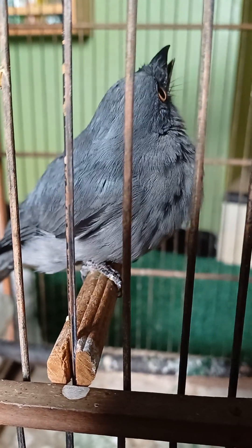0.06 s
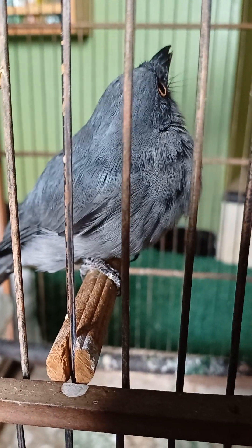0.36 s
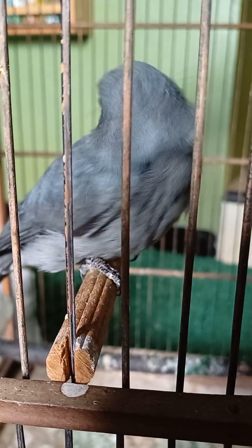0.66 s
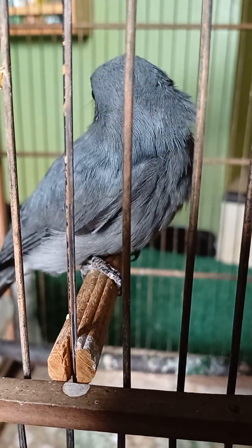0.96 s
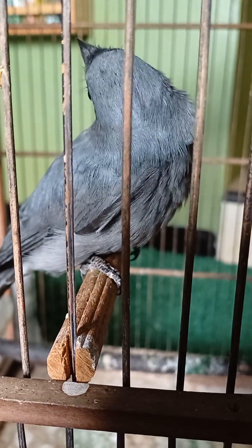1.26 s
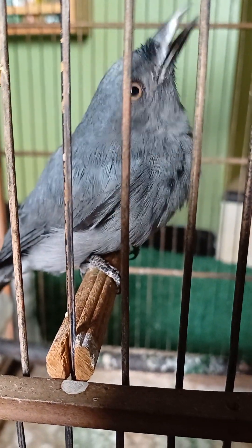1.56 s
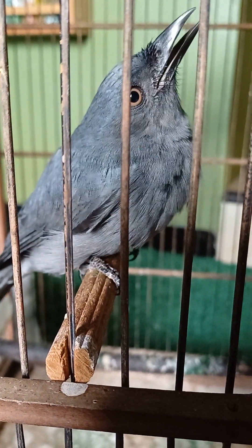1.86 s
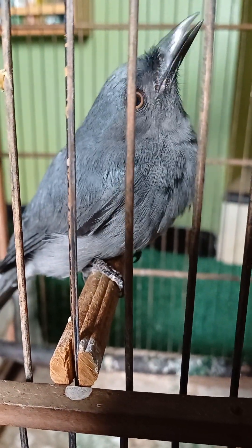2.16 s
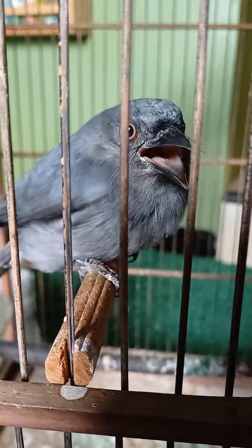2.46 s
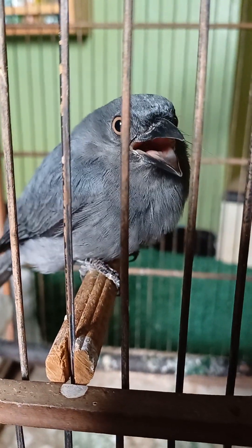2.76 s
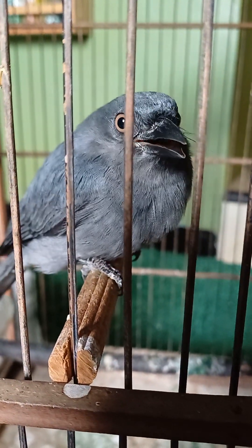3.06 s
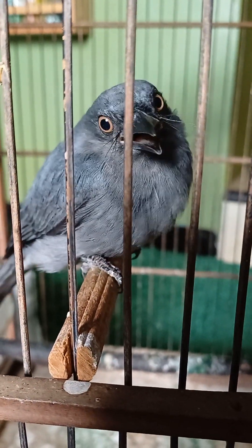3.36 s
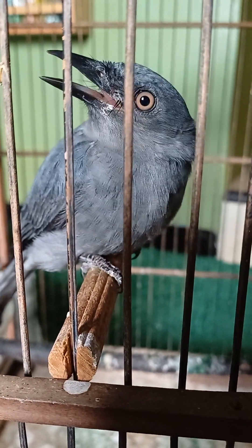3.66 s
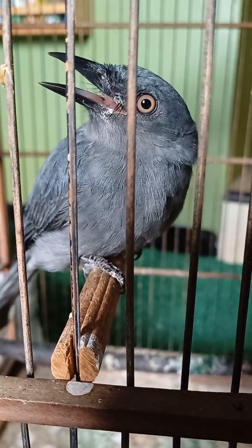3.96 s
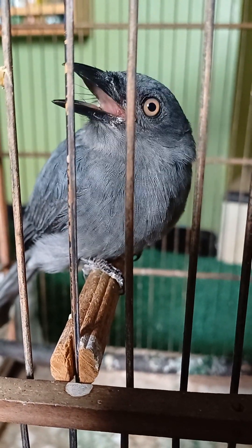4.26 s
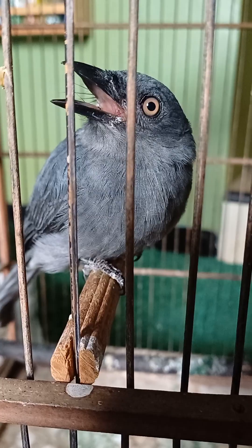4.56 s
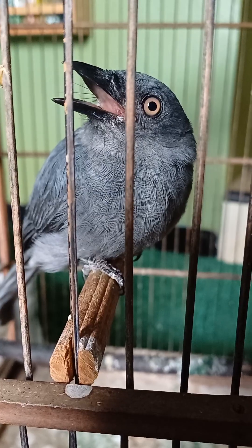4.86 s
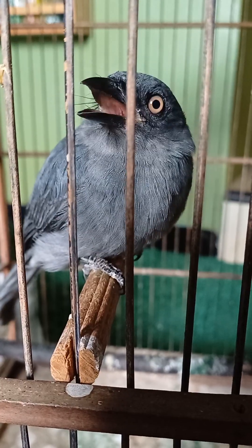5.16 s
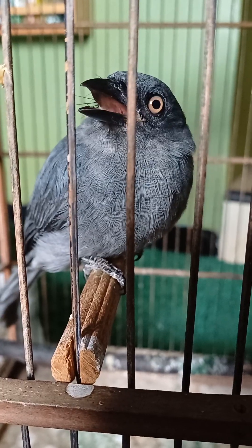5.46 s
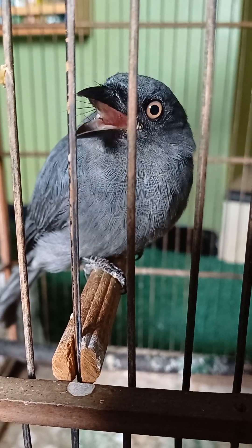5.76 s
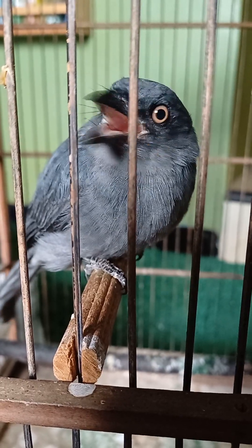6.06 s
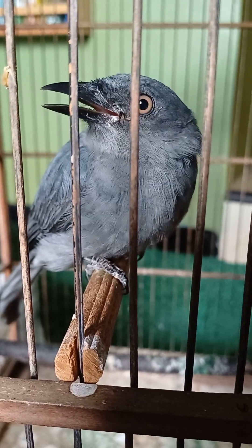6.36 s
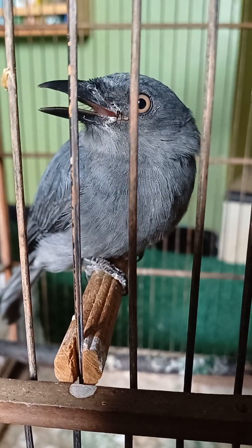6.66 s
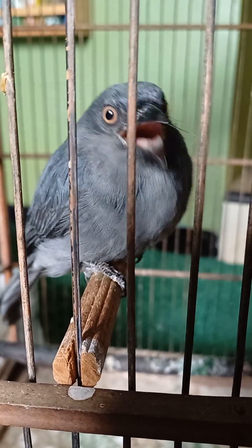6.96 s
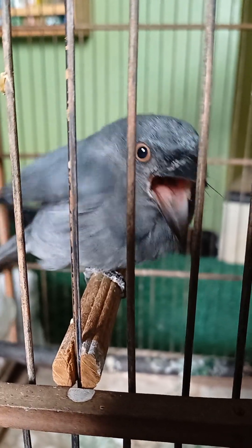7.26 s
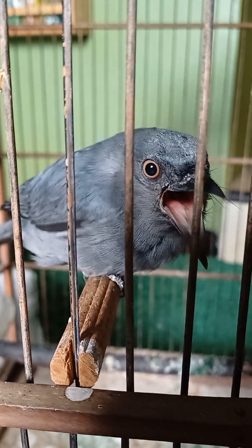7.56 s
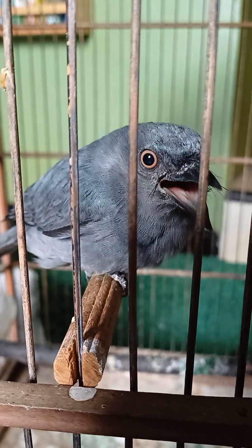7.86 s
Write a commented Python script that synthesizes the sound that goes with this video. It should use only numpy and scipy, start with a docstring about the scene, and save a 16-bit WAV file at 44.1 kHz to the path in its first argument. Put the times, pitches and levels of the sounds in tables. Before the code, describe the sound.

A caged bird, close to the microphone on a porch, gives three thin rising whistles and pauses for about a second. It then sings a long, rapid run of upward chirps, some clear and some scratchy, with three louder outbursts of low, harsh rasping. The cage and walls add a short ring, while traffic rumbles and engines drone faintly far down the street.

```python
"""Caged drongo on a porch

Close to a phone's two microphone ports, a drongo sings runs of upward chirps, about seven a second.
Each is one sweep of the syrinx: ragged and rasping while low, clearing towards a whistle as it climbs.
Cage and porch walls add a short ring; traffic rumbles and engines drone far down the street."""
import sys
import numpy as np
from scipy import signal
from scipy.fft import rfft, irfft, next_fast_len
from scipy.io import wavfile
from scipy.ndimage import uniform_filter1d

SR = 44100
rng = np.random.default_rng(int(sys.argv[2]) if len(sys.argv) > 2 else 0)


def master(y):
    """Save y as 16-bit WAV."""
    cut = np.clip(np.atleast_2d(y).T, -1, 1)
    pcm = np.round(cut * 32767)  # scale
    wavfile.write(sys.argv[1], SR, pcm.astype(np.int16))


N = 352359
TIME = np.arange(N) / SR
MID_SWEEP = .55  # share of a chirp's length at which it passes its middle pitch


def undb(db):
    """Decibels to gain."""
    return 10 ** (np.asarray(db) / 20)


def unit(x):
    """Scale to rms 1."""
    return x / np.sqrt(np.mean(x ** 2) + 1e-18)


def response(points, hz):
    """Read (frequency [Hz], value) points on a log-frequency axis."""
    at, value = np.transpose(points)
    return np.interp(np.log(hz + 1), np.log(at), value)


def shaped(x, gain):
    """Filter by a complex gain given as a function of Hz."""
    size = next_fast_len(len(x) + 512)
    return irfft(rfft(x, size) * gain(np.fft.rfftfreq(size, 1 / SR)), size)[:len(x)]


def colour(x, points):
    """Filter by (frequency [Hz], gain [dB]) points."""
    return shaped(x, lambda hz: undb(response(points, hz)))


def steady(x, size=301):
    """Even out the level, leaving the grain of single cycles."""
    return x / np.sqrt(uniform_filter1d(uniform_filter1d(x ** 2, size), size) + 1e-12)


def wander(rate_hz):
    """Slow random drift with a spread near 1."""
    return np.interp(TIME * rate_hz, np.arange(1024), rng.standard_normal(1024))


def street(mid_db=-40, side_db=-43.0, flutter_db=1, follow=0.35):
    """Far traffic: a wavering rumble and hiss, a little stronger at the right port."""
    # street noise common to both ports, and differing between them: (frequency [Hz], relative level [dB])
    mid_spectrum = [(15, -53), (25, -30), (53, -6.5), (141, -1), (170, -4), (301, -7.5), (545, -10.5),
                    (1740, -15.5), (2610, -16), (2990, -24.5), (3340, -21), (3620, -22), (7710, -35),
                    (11300, -36.5), (16000, -34)]
    side_spectrum = [(15, -52), (25, -39), (59, -12), (695, -10.5), (796, -7.5), (1040, -9), (2410, -8.5),
                     (2910, -16.5), (3620, -15), (7710, -30.5), (16000, -31)]
    # rise and fall of the traffic, followed only in part: (time [s], level [dB])
    traffic = [(0.0, -37.5), (1.44, -27), (2.71, -32), (7.99, -37)]
    mid = unit(colour(rng.standard_normal(N), mid_spectrum))
    side = unit(colour(rng.standard_normal(N), side_spectrum))
    traffic_db = np.interp(TIME, *np.transpose(traffic))
    swell = undb(follow * (traffic_db - traffic_db[SR]) + flutter_db * wander(9))
    out = []
    for sign in (1, -1):  # left, right
        noise = undb(mid_db) * mid + sign * undb(side_db) * side
        shading = [(120, -1.2 * sign), (900, -.2 * sign), (3500, -2.8 * sign), (10000, -1.5 * sign)]
        noise = colour(noise, shading)
        rumble = colour(noise, [(700, 1), (3000, 1.3)])
        out.append(noise + (swell - 1) * rumble)
    return np.array(out)


def engines(fade_s=0.058):
    """Far engines drone in and out, never quite steady in pitch or level."""
    # engine tones: (start [s], end [s], mean pitch [Hz], mean level [dB])
    drones = [(0, 8, 66, -55), (.7, 2.2, 142, -48), (1.9, 2.8, 262, -52), (1.7, 4.9, 524, -57),
              (2.2, 4.6, 786, -62)]
    out = np.zeros(N)
    for start, end, hz, db in drones:
        fade = np.clip(np.minimum(TIME - start, end - TIME) / fade_s, 0, 1)
        turns = np.cumsum(hz * (1 + .006 * wander(12))) / SR
        out += fade * undb(db + 2 * wander(12)) * np.sqrt(2) * np.sin(2 * np.pi * turns)
    return out


def porch(song, t60=0.33, left_db=-20.5, right_db=-15.5, delay_s=0.00095):
    """The porch walls return a dying cloud of reflections, different at each port."""
    # colour of the wall reflections: (frequency [Hz], gain [dB])
    walls = [(600, -9), (2500, 6.5), (5500, 5.5), (8000, 1), (11000, 1.5), (16000, -4)]
    t = TIME[:SR]
    out = []
    for db in (left_db, right_db):
        tail = rng.standard_normal(SR) * np.exp(-np.log(1000) * t / t60) * (t > delay_s)
        tail = colour(tail / np.linalg.norm(tail), walls)
        out.append(undb(db) * signal.fftconvolve(song, tail)[:N])
    return np.array(out)


def cage(note, left_db=-10, right_db=-12, t60=0.055):
    """Near reflections off bars and tray, new for each chirp as the head turns."""
    # colour thrown back by the thin bars: (frequency [Hz], gain [dB])
    bars = [(1200, 2), (2400, 3), (3050, 3), (3800, 0), (5500, 2.5), (12000, 4)]
    t = TIME[:SR // 40]
    tails = rng.standard_normal((2, len(t))) * np.exp(-np.log(1000) * t / t60)
    reflected = colour(note, bars)
    return np.array([undb(db) * signal.fftconvolve(reflected, tail / np.linalg.norm(tail))
                     for db, tail in zip((left_db, right_db), tails)])


def microphone_ports(note, lean, less_delay=0.11, less_shade=0.8):
    """The bird sits off axis: the ports hear it with different delay and shade, less so as it leans in."""
    # shading between the ports, before scaling by lean and side: (frequency [Hz], left minus right [dB])
    balance = [(1000, 0.5), (2400, 1), (4300, -2.5), (5400, -4), (6200, -13.5), (7400, 12.5), (8700, 23),
               (10000, 4.5), (12500, 3), (14200, 7.5), (15500, 24)]
    # delay between the ports, likewise before scaling: (frequency [Hz], lead of the left [rad])
    phase_lead = [(0, 0), (600, .1), (1100, 2.1), (2100, 4.7), (2550, 6.3), (2950, 9.4), (3950, 12.6),
                  (5100, 15.7), (5750, 22), (6500, 25.1), (7000, 28), (9000, 29), (10400, 31.4),
                  (16000, 41)]

    def gain(hz, side):
        shade_db = (1.5 - less_shade * lean) * response(balance, hz)
        power = 2 / (1 + undb(-2 * side * shade_db))
        lead = np.interp(hz * (1 - less_delay * lean), *np.transpose(phase_lead))
        return np.sqrt(power) * np.exp(.5j * side * lead)
    return np.array([shaped(note, lambda hz: gain(hz, side)) for side in (0.849, -1.182)])


def sweep(stage, foot_hz, middle_hz, top_hz, rasp, lift=1.7, whistle_bend=2.2, harsh_bend=1.0):
    """Pitch lifts off a low foot; a whistle rounds off at the top, a harsh call climbs to the end."""
    bend = whistle_bend + (harsh_bend - whistle_bend) * rasp
    rising = np.clip(stage / MID_SWEEP, 0, 1) ** lift
    topping = 1 - np.clip((1 - stage) / (1 - MID_SWEEP), 0, 1) ** bend
    return foot_hz + (middle_hz - foot_hz) * rising + (top_hz - middle_hz) * topping


def pressure_db(stage, length, swell_db, crest, crest_db=1.28, sag_db=-3,
                attack_s=.013, attack_db=-10, release_s=0.0062, release_db=-24):
    """Air pressure through one chirp: it opens quickly, swells, sags and is cut off."""
    body_db = crest_db + np.interp(stage, [0, min(crest, .99), 1], [-swell_db, 0, sag_db])
    opening = np.clip(1 - stage * length / attack_s, 0, 1)
    closing = np.clip(1 - (1 - stage) * length / release_s, 0, 1)
    return body_db + attack_db * opening + release_db * closing


def roughness(stage, hz, rasp, catch, clearing=0.3, settle_hz=1991, settle_span_hz=257):
    """The membranes start ragged and settle towards regular motion as their tension rises."""
    ragged = rasp ** np.interp(stage, [0, .6], [.3, 1]) * (1 - clearing * stage ** 2)
    slack = 0.817 * np.clip((settle_hz - hz) / settle_span_hz, 0, 1)
    return np.maximum.reduce([ragged, slack, .9 * catch])


def syrinx(hz, rough, jitter=.06, shimmer_db=4.5, doubling_db=7.0, oversample=4):
    """One pulse a cycle, and the cycle's phase; rough cycles stray in length and size."""
    samples = np.arange(len(hz))
    turns = np.cumsum(hz) / SR
    cycle = np.arange(int(turns[-1]))
    onsets = np.interp(cycle, turns, samples)
    stray, swell = rng.standard_normal((2, 512))[:, :len(cycle)]
    rough, cycle_hz = rough[onsets.astype(int)], hz[onsets.astype(int)]
    onsets = np.sort(onsets + np.cumsum(jitter * rough * stray * SR / cycle_hz))
    # a rough voice pushed higher alternates strong and weak cycles, adding a croak an octave below
    croak_db = doubling_db * rough * np.interp(cycle_hz, [1300, 1600], [0, 1])
    size = undb(rough * (shimmer_db * swell + croak_db * (-1) ** cycle))
    # each pulse is shared between two neighbours on a finer grid
    fine = np.zeros(oversample * len(hz) + 2)
    place = np.clip(oversample * onsets, 0, oversample * len(hz))
    np.add.at(fine, place.astype(int), size * (1 - place % 1))
    np.add.at(fine, place.astype(int) + 1, size * (place % 1))
    pulses = signal.resample_poly(fine, 1, oversample)[:len(hz)]
    return pulses, np.interp(samples, onsets, cycle) % 1


def breath(phase, rough, rough_db=1, floor_db=-22, puff_cycles=0.54):
    """Each pulse tears off a puff of air, louder the rougher the voice."""
    # colour of the torn air: (frequency [Hz], gain [dB])
    air_spectrum = [(300, -35), (1500, -1), (2400, -2.5), (3000, -1), (3600, 4), (4600, 3), (5500, -2.5),
                    (6500, 1), (9500, -14.5), (11000, -8.5), (12800, -5.5), (14300, -2), (16000, -12)]
    puffs = rng.standard_normal(SR // 4)[:len(phase)] * np.exp(-phase / puff_cycles)
    return (undb(rough_db) * rough ** 1.3 + undb(floor_db)) * unit(colour(puffs, air_spectrum))


def throat(pulses, phase, hz, rasp, gape, second_db=-6, skin_db=-10):
    """The throat colours the pulses and lifts the second harmonic as that passes its resonance."""
    # resonances of the throat and open beak: (frequency [Hz], gain [dB])
    tract = [(150, -64), (700, -4), (1200, -3), (1700, -0.5), (2200, 0), (3200, 2.5), (4500, 1), (5400, -2),
             (6500, -1.5), (8500, -2.5), (11000, -11.5), (14000, -7), (16000, -31)]
    resonance_db = response([(2800, -7.5), (4300, -4.5), (5200, 5), (6600, -3.5)], 2 * hz)
    second = np.cos(4 * np.pi * phase) * undb(second_db + 0.067 * gape + resonance_db)
    # in a harsh call the low fundamental also sounds through the skin
    fundamental = np.cos(2 * np.pi * phase) * rasp ** 2 * undb(skin_db)
    return steady(colour(pulses, tract)) + fundamental + second


def beak_gape(start, level_db, rasp, usual_db=-22, usual_rasp=0.35):
    """How open the beak sounds from the microphone: wider when loud, harsh or facing it; 0 is ordinary."""
    # treble won or lost as the head turns, before the beak scales it: (time [s], level [dB])
    facing = [(0, -9.5), (.45, -4.5), (1.5, 0.5), (2.2, -5), (2.8, 4), (3.2, -0.5), (5, 1), (6.4, -2),
              (7.1, 0), (7.6, 5)]
    effort = 1.48 * (level_db - usual_db) + 11 * (rasp - usual_rasp)
    return effort + np.interp(start, *np.transpose(facing))


def beak(voice, gape):
    """A wider beak rings more near 4.6 kHz and lets out more treble."""
    db_per_gape = [(3500, 0), (4600, .64), (6200, .32), (9000, .56), (13500, .61)]
    return colour(voice, [(hz, db * gape) for hz, db in db_per_gape])


def chirp(start, end, middle_hz, top_hz, level_db,
          catch_s=.014, hook_hz=250.5, waver=.021, pure_db=-2, brighten_db=9):
    """One upward sweep of pulses and air; slack membranes rattle, taut ones whistle."""
    # the voice's character by register:
    # (mid-sweep pitch [Hz], foot pitch [Hz], rasp [0-1], swell [dB], crest [share of the length])
    registers = [(1270, 1110, 0.99, 6, .86), (1481, 1230, 0.9, 10.5, 0.68), (1763, 1530, .5, 10, 0.68),
                 (2226, 1660, 0.35, 12, 0.78), (2514, 2000, 0.07, 11.5, 0.74), (2796, 1900, 0.06, 15, 0.78)]
    register_hz, *traits = np.transpose(registers)
    foot_hz, rasp, swell_db, crest = (np.interp(middle_hz, register_hz, trait) for trait in traits)
    gape = beak_gape(start, level_db, rasp)
    length = end - start
    stage = np.linspace(0, 1, int(length * SR))
    tremor = np.interp(stage, np.linspace(0, 1, 16), rng.standard_normal(16))
    # the voice catches as it starts: a brief scratch, the pitch hooking down onto its foot
    catch = np.exp(-(stage * length / catch_s) ** 2)
    hz = sweep(stage, foot_hz, middle_hz, top_hz, rasp) + hook_hz * (1 - rasp) * catch
    hz = uniform_filter1d(hz * (1 + waver * tremor), size=300, mode="nearest")
    rough = roughness(stage, hz, rasp, catch)
    pulses, phase = syrinx(hz, rough)
    voice = throat(pulses, phase, hz, rasp, gape) + breath(phase, rough)
    # a whistle starts with fewer overtones than a rasp, and gains them as it climbs
    overtones = colour(voice, [(6300, -40), (7500, 0)])
    overtone_db = (1 - rasp) * (pure_db + brighten_db * (stage - MID_SWEEP))
    voice += overtones * (undb(overtone_db) - 1)
    envelope = undb(level_db + pressure_db(stage, length, swell_db, crest))
    return steady(beak(voice, gape)) * envelope * signal.windows.tukey(len(hz), .05)


def drongo(direct_db=-1.83):
    """The bird at close range: its bare song, and what reaches each port directly and off the cage."""
    # three thin whistles, a pause, then scratchy runs with three harsh outbursts:
    # (start [s], end [s], mid-sweep pitch [Hz], top pitch [Hz], level [dB])
    chirps = [ (0.0, 0.055, 2740, 3410, -23.5), (0.187, 0.267, 2680, 3396, -27),
              (0.364, 0.457, 2530, 3380, -27.5), (1.468, 1.538, 1795, 1945, -24),
              (1.593, 1.672, 1587, 2174, -24), (1.739, 1.814, 2070, 2900, -23.5),
              (1.885, 1.966, 2346, 2880, -25.5), (2.057, 2.136, 2505, 2825, -26),
              (2.226, 2.331, 1528, 2300, -18), (2.359, 2.444, 1292, 2057, -16.5),
              (2.484, 2.576, 1267, 2420, -17), (2.619, 2.708, 1314, 1990, -19),
              (2.748, 2.836, 1493, 2570, -22), (2.884, 2.992, 1946, 2535, -24.5),
              (3.054, 3.15, 2217, 2680, -25), (3.22, 3.311, 1954, 2780, -23),
              (3.358, 3.444, 1733, 2820, -23), (3.499, 3.593, 2427, 2947, -22.5),
              (3.653, 3.748, 2240, 3110, -21.5), (3.809, 3.896, 2205, 2914, -21),
              (3.958, 4.049, 2270, 2956, -21), (4.108, 4.206, 2185, 2597, -20.5),
              (4.258, 4.349, 1523, 2457, -19), (4.403, 4.501, 1988, 2916, -20),
              (4.554, 4.647, 1854, 2595, -19.5), (4.698, 4.785, 1943, 2610, -18.5),
              (4.837, 4.92, 1711, 2616, -17.5), (4.983, 5.077, 1668, 2660, -19),
              (5.143, 5.22, 2010, 2940, -19), (5.311, 5.404, 2630, 2962, -19.5),
              (5.485, 5.581, 2490, 2850, -20.5), (5.654, 5.743, 1846, 2630, -19.5),
              (5.784, 5.877, 1527, 2355, -17), (5.926, 6.013, 1459, 2373, -17),
              (6.065, 6.153, 1372, 2390, -17), (6.21, 6.303, 1847, 2773, -19.5),
              (6.376, 6.455, 2870, 3174, -17), (6.585, 6.695, 2620, 3040, -19.5),
              (6.839, 6.928, 2647, 2978, -19), (6.974, 7.081, 1574, 2200, -16.5),
              (7.113, 7.203, 1396, 2250, -14), (7.236, 7.332, 1233, 2340, -15.5),
              (7.367, 7.458, 1217, 2054, -16), (7.497, 7.594, 1279, 2293, -16.5),
              (7.631, 7.732, 2070, 2563, -19.5), (7.779, 7.885, 2240, 2690, -21.5),
              (7.927, 8.019, 1426, 1880, -21.5)]
    # how far the bird leans down towards the microphone: (time [s], lean [0-1])
    leaning = [(2.1, 0), (2.45, 0.43), (3.3, 0), (6.9, 0), (7.35, 0.8)]
    song, near = np.zeros(N + SR), np.zeros((2, N + SR))
    for start, end, middle_hz, top_hz, level_db in chirps:
        note = chirp(start, end, middle_hz, top_hz, level_db)
        ring = cage(note)
        lean = np.interp(start, *np.transpose(leaning))
        at = int(start * SR)
        song[at:at + len(note)] += note
        near[:, at:at + len(note)] += undb(direct_db) * microphone_ports(note, lean)
        near[:, at:at + ring.shape[1]] += ring
    return song[:N], near[:, :N]


def scene():
    """Bird and cage up close, the porch around them, the street far behind."""
    song, near = drongo()
    return near + porch(song) + street() + engines()


def record(dry, right_cutoff_hz=14500, top_hz=15900):
    """The right channel's treble is cut steeply above 14.5 kHz, and both channels lose the very top."""
    right = shaped(dry[1], lambda hz: 1 / np.sqrt(1 + (hz / right_cutoff_hz) ** 110))
    lowpass = signal.ellip(10, .1, 60, top_hz, fs=SR, output="sos")
    return signal.sosfiltfilt(lowpass, np.array([dry[0], right]))


dry = scene()
out = record(dry)
master(out)
```